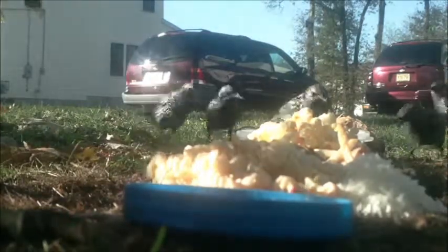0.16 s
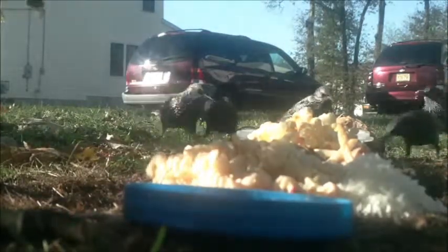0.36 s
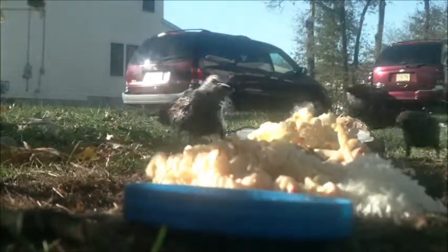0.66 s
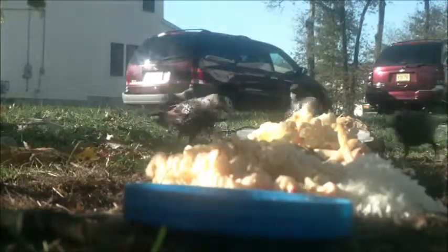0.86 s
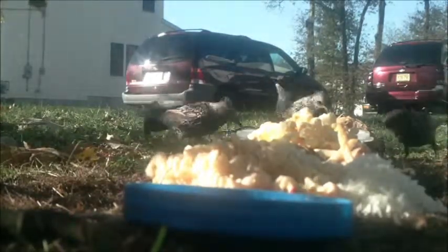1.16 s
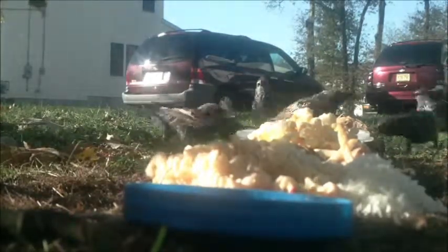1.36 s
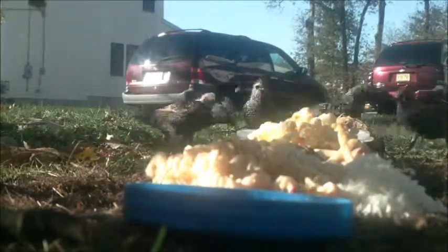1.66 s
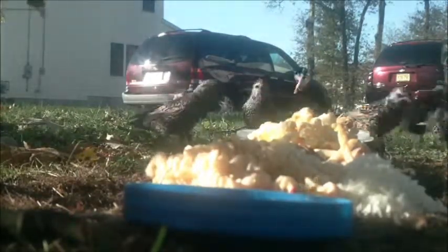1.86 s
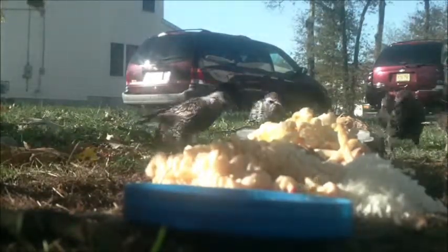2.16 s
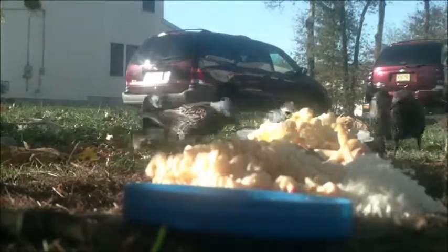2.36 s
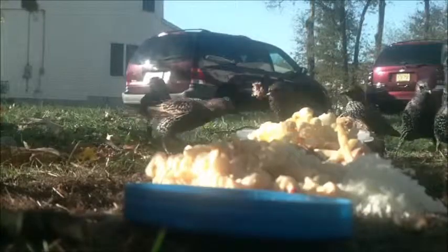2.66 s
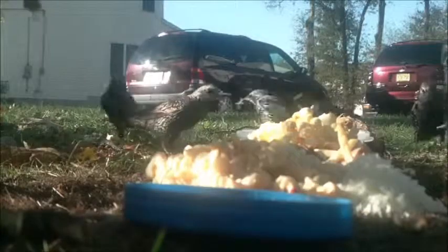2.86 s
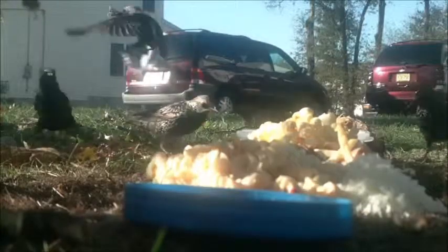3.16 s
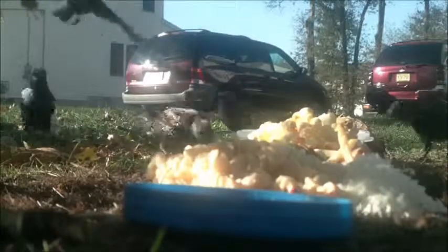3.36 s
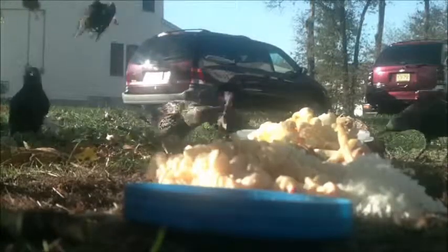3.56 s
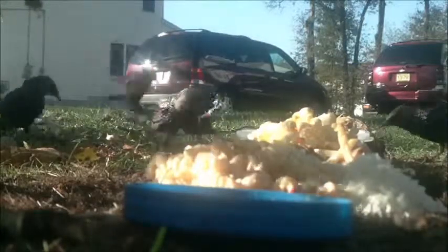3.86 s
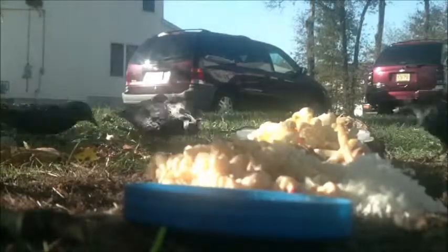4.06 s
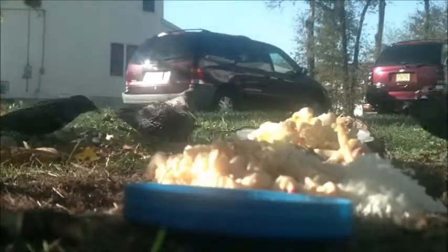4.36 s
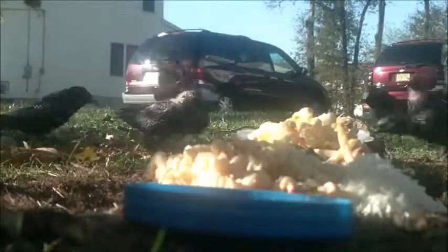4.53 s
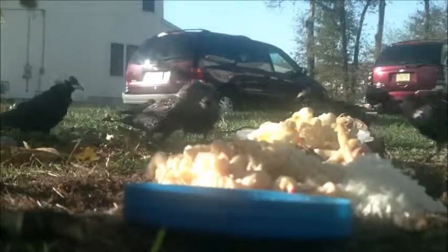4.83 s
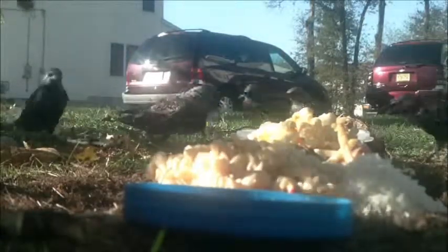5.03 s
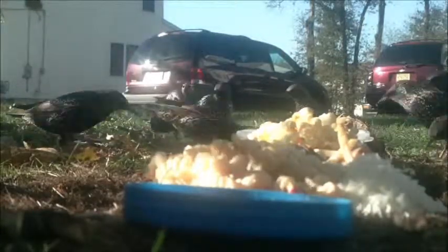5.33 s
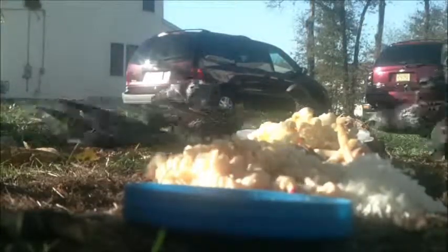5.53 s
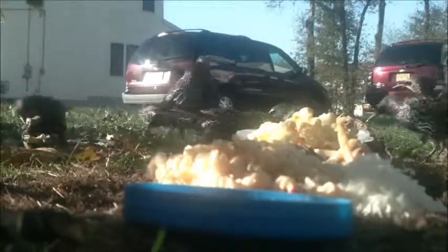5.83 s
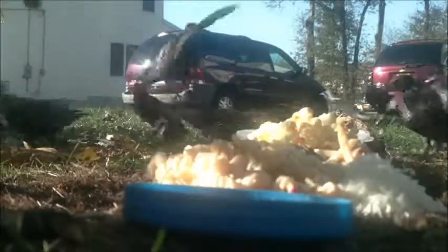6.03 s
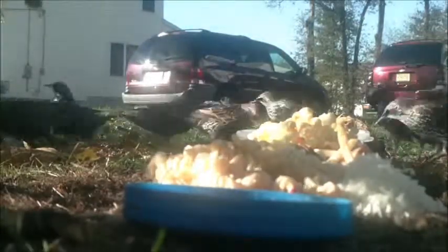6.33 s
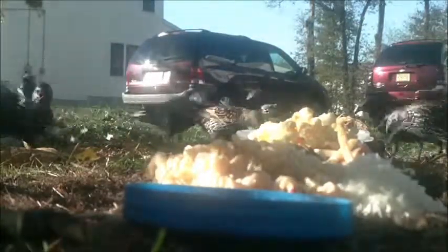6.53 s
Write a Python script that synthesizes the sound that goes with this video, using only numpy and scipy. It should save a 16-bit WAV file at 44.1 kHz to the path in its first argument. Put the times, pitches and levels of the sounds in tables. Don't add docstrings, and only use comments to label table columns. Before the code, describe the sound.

Starlings bicker a step or two away: raspy squawks, tiny chirps, chattering trills and dry beak cracks, with a brief echo off a house wall. Faint calls of other birds fill the pauses. Low wind noise swells and buffets the microphone in the middle, over soft hiss and a far engine hum. After a bright descending whistle the birds grow busier, ending loud, shrill and crowded.

```python
import sys
import numpy as np
from scipy import signal
from scipy.fft import rfft, irfft
from scipy.io import wavfile
from scipy.ndimage import uniform_filter1d

SR = 44100
rng = np.random.default_rng(int(sys.argv[2]) if len(sys.argv) > 2 else 0)


def volts_from_db(level):
    exponent = np.asarray(level, float) / 20
    return 10 ** exponent


def wav_out(sig):
    wavfile.write(sys.argv[1], SR, np.round(np.clip(np.atleast_2d(sig).T, -1, 1) * 32767).astype(np.int16))


N = 295029

# full_voice_s, length_ms, level_db, throat_hz, brightness_db (above 10 kHz)
SQUAWK_EVENTS = [(0.0, 66, -48, 2300, 3), (0.05, 120, -46, 2200, -15), (0.145, 30, -53, 2820, -15),
                 (0.22, 93, -32, 4800, -17), (0.537, 120, -28.5, 5300, -8), (0.627, 40, -26.5, 5500, -3.5),
                 (0.66, 110, -35, 5200, -13), (1.195, 93, -45.5, 4870, 1), (1.31, 77, -48.5, 3500, 9.5),
                 (1.68, 58, -33, 4600, -9), (1.735, 120, -34, 4140, -18), (2.69, 90, -35, 3000, -14),
                 (2.77, 93, -33, 3300, -11), (2.858, 122, -36.5, 4670, -14), (3.605, 57, -44, 3400, -5),
                 (4.22, 70, -43, 5500, -17), (4.29, 190, -43, 3000, -17), (5.061, 180, -36, 3870, -7),
                 (5.436, 38, -35, 3000, -9), (5.69, 72, -39, 4270, -4), (5.80, 50, -28, 4400, -8.5),
                 (5.87, 185, -28.5, 4900, -5), (6.052, 370, -32.5, 4650, -9.5), (6.272, 93, -25, 4930, -4),
                 (6.445, 100, -31.5, 4900, -9), (6.682, 33, -20.5, 4500, -8)]
SQUAWK_RISE_DB_PER_S, SQUAWK_SAG_DB, SQUAWK_FALL_DB_PER_S = 1500, 7.5, 900
FAR_FLOCK_DB, FAR_FLOCK_HZ, FAR_FLOCK_BRIGHT_DB = -58, 3600, 0
BIRDS_PAN_DB = 2

# time_s, pitch_hz, level_db
FALLING_CALL = [
    (4.144, 6700, -38),
    (4.165, 6970, -23.5),
    (4.187, 6680, -21.5),
    (4.205, 6050, -36),
    (4.217, 5550, -33),
    (4.227, 5150, -31.5),
    (4.24, 4500, -41),
    (4.255, 4050, -37),
    (4.288, 3900, -36.5),
]
STUTTER_FROM_S, STUTTERS_PER_S, STUTTER_RISE = 4.2015, 120, 0.16
# time_s, pitch_hz, level_db
ARCH_WHISTLE = [
    (6.046, 5110, -32),
    (6.056, 6200, -39),
    (6.073, 6790, -38),
    (6.086, 6000, -34),
    (6.095, 5370, -34.5),
    (6.112, 5000, -35),
    (6.118, 5900, -28),
    (6.125, 7340, -35),
]
# time_s, pitch_hz, level_db
DIP_WHISTLE = [
    (6.152, 4410, -31),
    (6.166, 4800, -31),
    (6.177, 4350, -24),
    (6.19, 4100, -32),
    (6.2, 4270, -39),
    (6.208, 4800, -38),
    (6.22, 4700, -40),
]
# time_s, pitch_hz, level_db
CREST_WHISTLE = [
    (6.415, 3830, -47),
    (6.445, 4840, -35),
    (6.46, 5650, -30),
    (6.478, 5800, -38),
    (6.498, 5450, -37),
]
# time_s, pitch_hz, level_db
ARCHED_WHISTLES = [
    [(0.766, 4000, -40), (0.772, 5200, -37), (0.783, 6600, -37), (0.795, 6400, -37), (0.805, 6500, -42),
     (0.822, 5500, -47)],
    [(1.688, 6000, -50), (1.702, 7000, -43), (1.712, 6100, -43), (1.722, 5000, -33), (1.729, 5400, -45)],
    [(1.816, 3600, -42), (1.822, 5000, -38), (1.833, 6200, -35), (1.848, 6000, -40), (1.87, 5900, -50)],
    [(2.856, 3500, -42), (2.862, 4900, -42), (2.872, 5500, -39), (2.881, 5850, -39)],
    [(2.688, 2600, -50), (2.708, 2400, -43), (2.72, 2500, -40), (2.728, 3000, -43)],
]
# time_s, pitch_hz, level_db
HIGH_WHISTLE = [
    (6.352, 8550, -51),
    (6.385, 8870, -40),
    (6.41, 8990, -34),
    (6.49, 8940, -33),
    (6.528, 9100, -34),
    (6.545, 8900, -49),
    (6.58, 8590, -51),
    (6.69, 9230, -46),
]
# time_s, pitch_hz, level_db
LOW_WHISTLE = [
    (6.562, 4460, -35),
    (6.585, 4220, -29),
    (6.61, 4370, -31.5),
    (6.645, 4630, -47.5),
    (6.68, 4600, -45),
]
# time_s, pitch_hz, level_db
FAR_WHISTLE = [
    (5.27, 6300, -63),
    (5.344, 6140, -46.5),
    (5.42, 6270, -56),
]

# start_s, length_ms, start_hz, end_hz, level_db
CHIRPS = [(0.541, 12, 3840, 4400, -41), (0.53, 16, 2000, 3600, -45), (0.545, 14, 1900, 2900, -47),
          (0.56, 8, 4600, 5100, -44), (1.183, 25, 3000, 7000, -50), (2.71, 14, 3610, 3300, -46),
          (2.728, 18, 3700, 4700, -44), (2.742, 13, 3400, 2200, -44), (1.886, 12, 4600, 6800, -56),
          (1.74, 8, 7000, 6000, -45), (5.089, 9.5, 2470, 3050, -40.5), (5.797, 16, 3500, 6500, -38),
          (5.201, 17, 5100, 5850, -47), (5.223, 18, 4600, 5400, -48), (6.158, 30, 3300, 3800, -44),
          (5.843, 20, 5800, 7400, -42), (5.932, 9, 6130, 4300, -35), (5.986, 12, 7200, 5000, -40),
          (6.106, 6, 7200, 6200, -39), (6.12, 14, 5400, 4600, -40), (6.128, 14, 6300, 5300, -41),
          (2.774, 10, 7200, 5400, -44), (6.26, 17, 2880, 2455, -43.5), (6.365, 19.5, 4540, 5840, -36.5),
          (6.503, 23, 4730, 5100, -43), (2.08, 12, 4800, 5400, -58), (2.495, 22, 6300, 7200, -57),
          (1.02, 10, 4500, 5000, -56)]
CHIRP_HALFWAY = 0.65
# start_s, length_ms, pitch_hz, level_db
PIPS = [(1.713, 14, 2400, -45), (4.236, 34, 3080, -51), (2.82, 14, 3150, -40), (2.862, 30, 2350, -44),
        (5.812, 6, 4100, -38), (5.305, 16, 7260, -54), (2.734, 10, 2000, -42.5), (2.801, 13, 3150, -35),
        (3.612, 16, 3050, -40), (5.082, 24, 6620, -47), (5.44, 18, 7200, -49), (5.918, 13, 4350, -41),
        (6.548, 11, 4680, -35)]
PIP_ARCH = 0.0283

# crest_s, length_ms, trough_hz, crest_hz, level_db
SCOOPS = [(0.218, 16, 2300, 3600, -48), (0.231, 13, 2800, 4000, -47), (0.244, 13, 2700, 4000, -47),
          (0.262, 18, 2600, 4300, -50), (0.285, 18, 2400, 3400, -49), (0.308, 22, 2200, 4200, -46),
          (0.329, 20, 2600, 4500, -48), (0.731, 12, 3700, 5400, -50), (0.744, 12, 3700, 5100, -49),
          (0.751, 8, 3600, 5400, -49), (1.696, 15, 2500, 3600, -43), (1.71, 14, 2700, 3700, -46),
          (1.761, 20, 2800, 5200, -43), (1.783, 21, 3000, 5400, -42), (1.802, 19, 2700, 5500, -44),
          (2.781, 12, 2900, 3500, -42), (2.796, 15, 3000, 3800, -40), (2.817, 21, 3000, 5400, -38),
          (2.838, 20, 2400, 5000, -41), (2.857, 19, 2100, 3600, -41), (2.921, 14, 2500, 3500, -46),
          (2.936, 15, 2700, 4200, -49), (2.956, 19, 3300, 6200, -45), (2.978, 21, 2400, 5100, -47),
          (2.996, 18, 2200, 4000, -47), (5.883, 13, 2700, 3700, -39), (5.895, 12, 3200, 4300, -37),
          (5.91, 13, 3500, 4600, -39), (5.922, 12, 4000, 4800, -38), (5.933, 11, 4200, 6100, -36),
          (5.945, 12, 4000, 5300, -35), (5.958, 13, 4000, 5300, -34), (5.967, 9, 4400, 6200, -36),
          (5.995, 18, 3200, 4300, -41), (6.025, 14, 3500, 6000, -43), (6.045, 16, 3400, 4700, -39)]
SCOOP_POINT, SCOOP_PAST_CREST = 2.5, 0.15
SCOOP_ENTRY, SCOOP_ROUGH = 0.65, 0.024

# start_s, length_ms, start_hz, end_hz, level_db
SLOW_TRILLS = [
    (1.097, 16, 3200, 3080, -49),
    (6.408, 45, 2600, 2600, -45),
]
# start_s, length_ms, start_hz, end_hz, level_db
FAST_TRILLS = [
    (5.058, 56.8, 2343, 2816, -40.5),
    (5.118, 120, 2700, 3200, -44.5),
]
# start_s, length_ms, start_hz, end_hz, level_db
GARGLES = [
    (5.817, 54, 2336, 2850, -36),
    (6.281, 58, 2895, 4210, -29.5),
    (6.503, 32, 2450, 2700, -42),
    (6.446, 88, 2755, 2570, -39),
]
# start_s, length_ms, start_hz, end_hz, level_db
RATTLES = [
    (0.012, 150, 950, 960, -45),
    (4.281, 150, 800, 1000, -44.5),
]
# start_s, length_ms, start_hz, end_hz, level_db
BUZZES = [(3.58, 105, 4900, 3000, -55), (3.85, 65, 2400, 2950, -46), (4.01, 90, 4100, 5100, -57),
          (4.712, 70, 5300, 4800, -48), (4.89, 170, 5800, 4300, -50), (5.561, 45, 1700, 2600, -46),
          (5.612, 110, 3800, 4200, -51), (5.732, 55, 1400, 2400, -51), (4.632, 45, 1300, 2400, -52),
          (2.312, 90, 5600, 5200, -57), (1.212, 70, 8350, 8300, -53), (6.656, 22, 8200, 3400, -46),
          (6.539, 11, 6800, 3600, -42), (4.401, 45, 9000, 8500, -55), (5.986, 90, 1650, 1500, -55),
          (6.681, 12, 3800, 3400, -32), (6.058, 85, 2500, 2300, -46), (6.365, 42, 2650, 2300, -43),
          (4.42, 60, 2300, 1900, -52), (5.0, 65, 1300, 2300, -53)]
# start_s, length_ms, start_hz, end_hz, level_db
BARKS = [
    (0.525, 15, 800, 1100, -41),
    (0.621, 24, 1080, 1250, -38),
    (5.435, 28, 1460, 1450, -46),
    (0.14, 18, 1600, 1650, -50),
]
# start_s, length_ms, start_hz, end_hz, level_db
FAR_CALLS = [(0.865, 50, 4200, 3500, -58), (0.97, 50, 1900, 2600, -58), (1.29, 70, 2400, 2600, -57),
             (1.51, 45, 1330, 1350, -57), (1.924, 14, 2800, 2750, -52), (1.926, 12, 3600, 4000, -55),
             (2.03, 60, 2800, 3300, -58), (2.17, 65, 3200, 2200, -55), (2.36, 40, 2500, 2400, -56),
             (2.525, 30, 1200, 1900, -57), (2.615, 50, 2400, 2400, -56), (3.515, 80, 1900, 2600, -57),
             (3.625, 30, 4200, 3900, -54), (3.66, 28, 3300, 3100, -53), (3.72, 55, 2600, 2900, -55),
             (3.868, 18, 1950, 1900, -52), (3.85, 25, 3800, 3500, -54), (3.93, 90, 2800, 3300, -57),
             (3.88, 45, 7300, 7300, -58), (1.79, 60, 2100, 1800, -55), (2.706, 45, 8400, 9300, -49),
             (2.85, 65, 8900, 8300, -47), (0.215, 40, 8700, 8600, -53), (6.055, 28, 4900, 4800, -41)]
# time_s, peak_db, knock_db (relative to the crack)
BILL_SNAPS = [(0.139, -35.5, 0.5), (0.188, -23, -16), (0.1934, -22.5, -14), (0.267, -32.5, -0.5),
              (0.3423, -26, -2.5), (0.637, -12.5, -15), (0.6384, -4.5, -33), (1.675, -27, -20),
              (1.732, -14.5, -13), (1.814, -28, -8), (2.765, -24, -7), (2.899, -17, -14), (2.903, -17, -21),
              (2.911, -24, -25), (2.995, -28, -6), (4.9, -33, -7.5), (5.1254, -37, 6), (5.9728, -19.5, -10),
              (6.0412, -35, 3), (6.102, -21, -11), (6.14, -14, -25), (6.2285, -26, -12), (6.2745, -2, -27),
              (6.4982, -16.5, -14)]

# time_s, level_db
WIND_LEVEL = [(0.0, -34.5), (0.15, -37.5), (0.8, -46), (0.9, -42.5), (2.37, -41), (2.75, -36.5),
              (2.93, -26.5), (3.2, -31), (3.37, -25.5), (3.58, -30), (3.75, -24.5), (3.9, -37), (4.3, -29),
              (4.52, -28.5), (4.6, -24), (4.79, -21), (5.12, -31.5), (6.4, -35), (6.68, -32)]
# time_s, above_wind_db
BUFFETS = [
    (0.31, 13.5),
    (2.69, 13.5),
    (3.04, 5.5),
    (3.14, 2.5),
    (3.31, 5),
    (3.41, 4),
    (4.02, 14.5),
    (4.12, 13),
    (4.215, 13.5),
    (5.0, 3),
]
BUFFET_WIDTH_S = 0.041
# frequency_hz, density_db (per Hz)
WIND_COLOUR = [(15, -25), (30, 11), (60, 15.5), (110, -1), (200, -12.5), (400, -34)]
# frequency_hz, density_db (per Hz)
AIR_COLOUR = [(20, -22), (60, -10.5), (140, -6), (250, -12), (420, -19.5), (560, -20), (800, -27),
              (1300, -32), (2600, -32), (4500, -36.5), (7000, -35), (10000, -39.5), (13500, -37),
              (15500, -38)]
# frequency_hz, correlation (1 = alike)
AIR_LIKENESS = [(60, 1), (180, 1), (550, 0.88), (1650, 0.75), (4970, -0.096), (15000, -0.27)]
AIR_DB = -39.2
HUM_HZ, HUM_WIDTH_HZ, HUM_DB = 86.55, 7.2, -38
NOTCH_HZ, NOTCH_WIDTH_HZ = 7820, 330


def hoarse():
    db, throat_hz, bright_db = squawking()
    chaos = 0
    for hz in (1500, 2300):
        jumping = voice(hz * np.exp(0.2 * drift(80)), np.zeros(5))
        chaos = chaos + jumping * volts_from_db(4.54 * np.clip(drift(49), -3, 1.5))
    breath = rng.standard_normal((2, N)) * volts_from_db(3.5 * np.clip(drift(120), -3, 1.3))
    source = rms_one(chaos) + 0.67 * rms_one(breath)
    low, power = 0, 0
    for hz in 1400 * 1.4 ** np.arange(6):
        gain = volts_from_db(-8.0 * np.log2(hz / throat_hz) ** 2)
        low = low + gain * volts_from_db(1.6 * drift(25)) * band(source, hz / 1.18, hz * 1.18)
        power = power + gain ** 2
    high = band(breath + 0.11 * chaos, low_hz=9700, high_hz=15600)
    high = high * volts_from_db(bright_db - 5.5 + 3.2 * drift(30))
    return (low / np.sqrt(power) + high) * sides(volts_from_db(db - 1.17), BIRDS_PAN_DB)


def squawking():
    t = np.arange(0, N / SR + 0.002, 0.001)
    s, ms, db, hz, bright_db = np.transpose(SQUAWK_EVENTS)[:, :, None]
    since, length = t - s, ms / 1000
    rise = SQUAWK_RISE_DB_PER_S * np.minimum(since, 0)
    sag = SQUAWK_SAG_DB * np.clip(since / length, 0, 1)
    fall = SQUAWK_FALL_DB_PER_S * np.maximum(since - length, 0)
    power, far = volts_from_db(2 * (db + rise - sag - fall)), volts_from_db(2 * FAR_FLOCK_DB)
    total = power.sum(axis=0) + far
    throat_hz = ((power * hz).sum(axis=0) + far * FAR_FLOCK_HZ) / total
    bright_db = ((power * bright_db).sum(axis=0) + far * FAR_FLOCK_BRIGHT_DB) / total
    return in_time(np.transpose([t, 10 * np.log10(total), throat_hz, bright_db]))


def whistle(rows, overtone_db, pan_db, stutter_s=np.inf):
    span = slice(round(rows[0][0] * SR), min(round(rows[-1][0] * SR), N))
    t = np.arange(N)[span] / SR
    s, hz, db = np.transpose(rows)
    hz, db = np.interp(t, s, hz), np.interp(t, s, db)
    gate = np.clip(np.minimum(t - s[0], s[-1] - t) / 0.0035, 0, 1)
    along = np.maximum(t - stutter_s, 0) * STUTTERS_PER_S % 1
    broken = t > stutter_s
    hz = hz * (1 + broken * STUTTER_RISE * (along - 0.5)) * (1 + 0.009 * drift(110)[span])
    gate = gate * np.where(broken, np.sqrt(np.sin(np.pi * along)), 1)
    level = volts_from_db(db + 2.6 * np.clip(drift(90)[span], -3, 1.5))
    out = np.zeros(N)
    out[span] = gate * level * voice(hz, [0, overtone_db])
    return sides(out, pan_db)


def sweeps():
    out = np.zeros(N)
    notes = [(s, ms, a, a + CHIRP_HALFWAY * (c - a), c, db) for s, ms, a, c, db in CHIRPS]
    notes += [(s, ms, hz, hz * (1 + PIP_ARCH), hz, db) for s, ms, hz, db in PIPS]
    for s, ms, a, b, c, db in notes:
        def pitch(u):
            return a + (4 * b - 3 * a - c) * u + 2 * (a + c - 2 * b) * u * u
        add(out, s, ms, pitch, db, [1.5, -25], fade_ms=4.4)
    return out * volts_from_db(2.0 * drift(90))


def scoops():
    out, tremble = np.zeros(N), drift(260)
    for s, ms, low, top, db in SCOOPS:
        def pitch(u):
            lift = np.abs(np.cos(np.pi * (u + SCOOP_PAST_CREST))) ** SCOOP_POINT
            lift = lift * np.where(u < 0.4, SCOOP_ENTRY, 1)
            return (low + (top - low) * lift) * (1 + SCOOP_ROUGH * tremble[int(s * SR):][:len(u)])
        start_s = s - (1 - SCOOP_PAST_CREST) * ms / 1000
        add(out, start_s, ms, pitch, db, [1.5, -9.0], fade_ms=3.0)
    return out * volts_from_db(2.8 * np.clip(drift(130), -3, 1.5))


def warbles(rows, rate, swing, uneven, rough, overtones_db, unsteady_db):
    out, tremble = np.zeros(N), drift(316)
    lucks = rng.uniform(0, 2 * np.pi, (len(rows), 2))
    for (s, ms, a, b, db), luck in zip(rows, lucks):
        def pitch(u):
            beat = 2 * np.pi * rate * ms / 1000 * u
            stray = np.sin(1.7 * beat + luck[0]) + 0.45 * np.sin(0.4 * beat + luck[1])
            wobble = np.cos(beat) + uneven * stray
            shake = np.resize(tremble[int(s * SR):], len(u))
            return (a + (b - a) * u) * (1 + swing * wobble + rough * shake)
        add(out, s, ms, pitch, db, overtones_db, fade_ms=7.0)
    return out * volts_from_db(unsteady_db * np.clip(drift(165), -3, 1.5))


def snaps():
    out, t = np.zeros(N), np.arange(300) / SR
    grits = rng.standard_normal((len(BILL_SNAPS), 2, 300))
    for (s, db, low_db), grit in zip(BILL_SNAPS, grits):
        crack = band(grit[0], low_hz=5200, high_hz=12700) * np.exp(-t / 0.00054) * 0.3
        knock = volts_from_db(low_db) * band(grit[1], low_hz=1280, high_hz=6800) * np.exp(-t / 0.0016) * 1.43
        at = round(s * SR)
        out[at:at + 300] += volts_from_db(db) * (crack + knock)
    return out


def yard(x):
    t = np.arange(round(0.3 * SR)) / SR
    tail = rng.standard_normal((2, len(t))) * volts_from_db(-60 * t / 0.15)
    tail *= np.clip((t - 0.004) / 0.0031, 0, 1)
    tail /= np.sqrt(np.sum(tail ** 2, axis=1, keepdims=True))
    return signal.fftconvolve(x, tail, axes=1)[:, :N]


def wind():
    db = wind_db()
    shared, left, right = (coloured(rng.standard_normal(N) * volts_from_db(0.6 * drift(20)), WIND_COLOUR)
                           for k in range(3))
    ports = 0.5 * shared + np.array([left, right])
    gust = band(ports, 12, 70) + volts_from_db(-4.5 + 0.6 * (db + 33)) * band(ports, 70, 400)
    return sides(gust * volts_from_db(db + 1.5), 2.1)


def wind_db():
    t = np.arange(N) / SR
    buffets = sum(db * np.clip(1 - np.abs(t - s) / BUFFET_WIDTH_S, 0, 1) for s, db in BUFFETS)
    return in_time(WIND_LEVEL)[0] + buffets


def air():
    hz = np.maximum(np.fft.rfftfreq(N, 1 / SR), 1)
    alike = np.clip(at_hz(AIR_LIKENESS, hz), -0.5, 0.98)
    mid, side = rfft(rng.standard_normal((2, N))) * volts_from_db(at_hz(AIR_COLOUR, hz))
    bed = irfft(np.sqrt(1 + alike) * mid + np.sqrt(1 - alike) * side * [[1], [-1]], N)
    b, a = signal.iirpeak(HUM_HZ, HUM_HZ / HUM_WIDTH_HZ, SR)
    hum = rms_one(signal.lfilter(b, a, rng.standard_normal(N)))
    swell_db = uniform_filter1d(in_time(WIND_LEVEL)[0], SR // 2) + 35
    bed = volts_from_db(AIR_DB + 0.5 * drift(2.1)) * rms_one(bed)
    return sides(bed + volts_from_db(HUM_DB + 0.4 * swell_db) * hum, 1.9)


def add(track, s, ms, pitch, db, overtones_db, fade_ms):
    t = np.arange(-fade_ms / 2, ms + fade_ms / 2, 1000 / SR)
    edge = np.sin(np.pi / 2 * np.clip(np.minimum(t - t[0], t[-1] - t) / fade_ms, 0, 1)) ** 2
    at = max(round((s + t[0] / 1000) * SR), 0)
    note = volts_from_db(db) * edge * voice(pitch(np.clip(t / ms, 0, 1)), overtones_db)
    track[at:at + len(t)] += note[:N - at]


def voice(hz, overtones_db):
    turn = 2 * np.pi * np.cumsum(hz) / SR
    partials = 0
    for k, db in enumerate(overtones_db, 1):
        partials = partials + volts_from_db(db) * np.sin(k * turn) * (k * hz < SR / 2.5)
    return np.sqrt(2) * partials


def drift(rate):
    r = np.exp(-16 * np.pi * rate / SR)
    slow = signal.lfilter([1], [1, -2 * r, r * r], rng.standard_normal(N // 8 + 4002))[4000:]
    return np.interp(np.arange(N) / 8, np.arange(len(slow)), rms_one(slow))


def band(x, low_hz, high_hz):
    sos = signal.butter(2, [low_hz, high_hz], "band", fs=SR, output="sos")
    return rms_one(signal.sosfilt(sos, x))


def coloured(x, spectrum):
    hz = np.maximum(np.fft.rfftfreq(N, 1 / SR), 1)
    return irfft(rfft(x) * volts_from_db(at_hz(spectrum, hz)), N)


def at_hz(points, hz):
    points = np.array(points)
    return np.interp(np.log(hz), np.log(points[:, 0]), points[:, 1])


def in_time(rows):
    s, *columns = np.transpose(rows)
    return [np.interp(np.arange(N) / SR, s, c) for c in columns]


def sides(x, pan_db):
    return x * volts_from_db([[pan_db / 2], [-pan_db / 2]])


def rms_one(x):
    return x / np.sqrt(np.mean(x ** 2) + 1e-20)


def scene():
    calls = sweeps() + scoops() + snaps()
    calls += warbles(SLOW_TRILLS, rate=46.0, swing=0.24, uneven=0.37, rough=0.04,
                     overtones_db=[0, -7, -17], unsteady_db=4.5)
    calls += warbles(FAST_TRILLS, rate=86.0, swing=0.15, uneven=0.3, rough=0.035,
                     overtones_db=[0, -7, -17], unsteady_db=3.5)
    calls += warbles(GARGLES, rate=72.0, swing=0.125, uneven=0.17, rough=0.022,
                     overtones_db=[0, -22], unsteady_db=2.5)
    calls += warbles(RATTLES, rate=59.0, swing=0.2, uneven=0.2, rough=0.035,
                     overtones_db=[-4, 0, -1, -16], unsteady_db=3.5)
    calls += warbles(BUZZES, rate=100.0, swing=0.083, uneven=0.33, rough=0.0383,
                     overtones_db=[-0.6, -24], unsteady_db=6.5)
    calls += warbles(BARKS, rate=210.0, swing=0.044, uneven=0.37, rough=0.06,
                     overtones_db=[0.5, -12, -13, -6], unsteady_db=3.5)
    calls += warbles(FAR_CALLS, rate=85.0, swing=0.05, uneven=0.5, rough=0.03,
                     overtones_db=[0, -20], unsteady_db=4.5)
    birds = hoarse() + sides(calls, BIRDS_PAN_DB)
    birds += whistle(FALLING_CALL, -25, 3.7, STUTTER_FROM_S)
    birds += whistle(ARCH_WHISTLE, -16, 2.6)
    birds += whistle(DIP_WHISTLE, -25, 2.3)
    birds += whistle(CREST_WHISTLE, -17, 2.4)
    birds += sum(whistle(rows, -22, BIRDS_PAN_DB) for rows in ARCHED_WHISTLES)
    birds += whistle(HIGH_WHISTLE, -60, 10.0)
    birds += whistle(LOW_WHISTLE, -19, 1.7)
    birds += whistle(FAR_WHISTLE, -7, 2.5)
    return birds + volts_from_db(-8) * yard(birds) + wind() + air()


def roll_off(x):
    return signal.sosfilt(signal.butter(12, 16210, fs=SR, output="sos"), x)


def record(dry):
    b, a = signal.iirnotch(NOTCH_HZ, NOTCH_HZ / NOTCH_WIDTH_HZ, SR)
    notched = signal.sosfilt([np.r_[b, a]] * 3, dry)
    mix = signal.sosfilt(signal.cheby2(12, 40, 15550, fs=SR, output="sos"), notched)
    return roll_off(mix)


dry = scene()
out = record(dry)
wav_out(out)
```